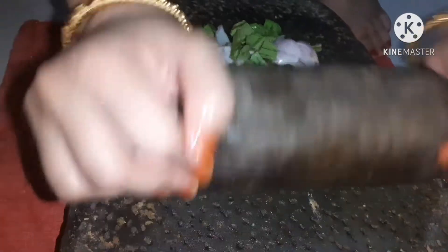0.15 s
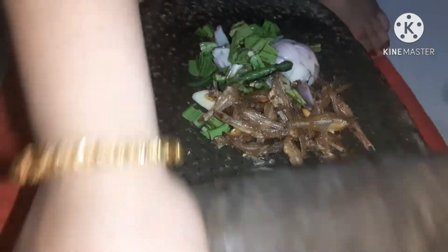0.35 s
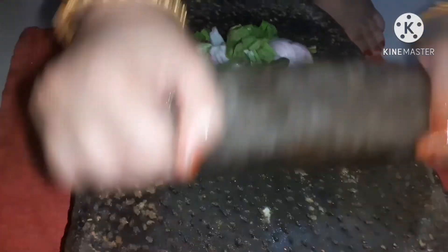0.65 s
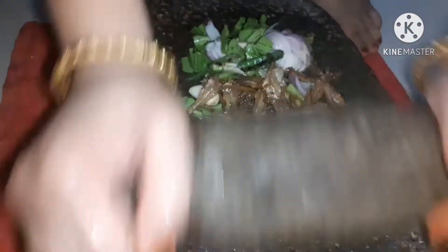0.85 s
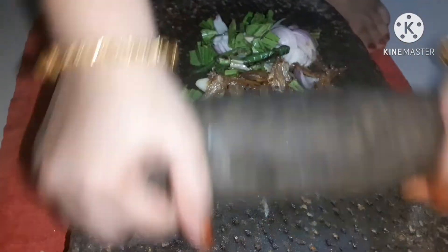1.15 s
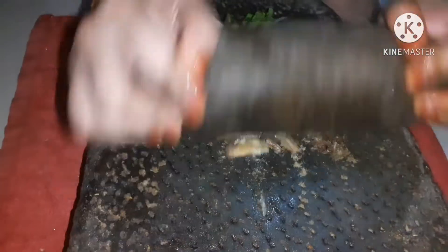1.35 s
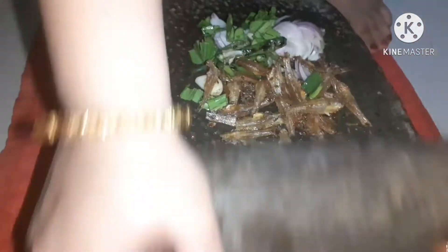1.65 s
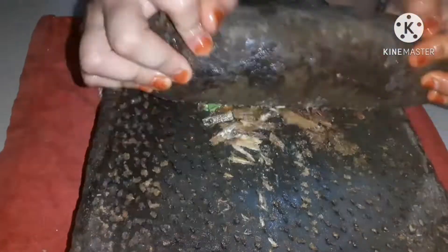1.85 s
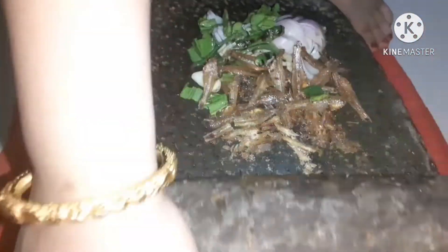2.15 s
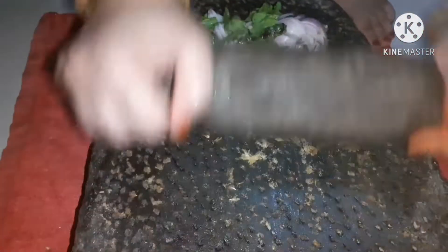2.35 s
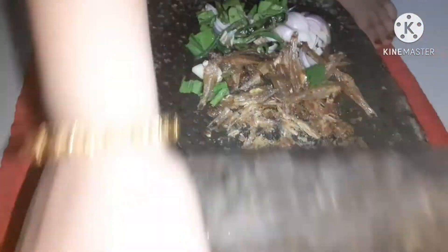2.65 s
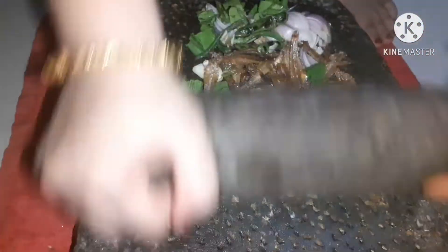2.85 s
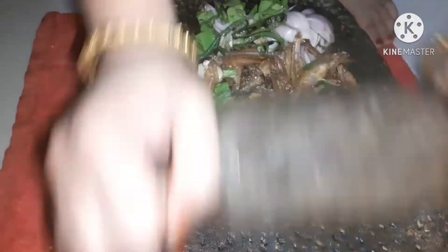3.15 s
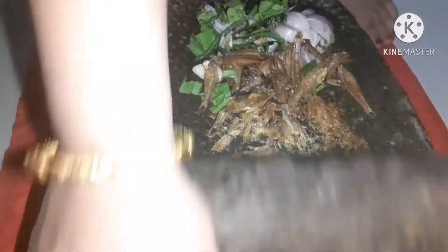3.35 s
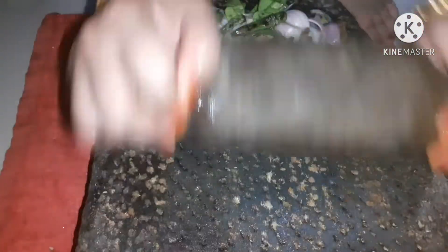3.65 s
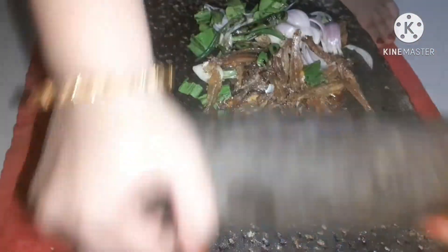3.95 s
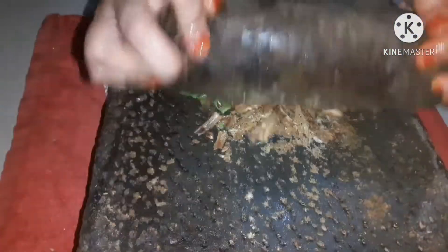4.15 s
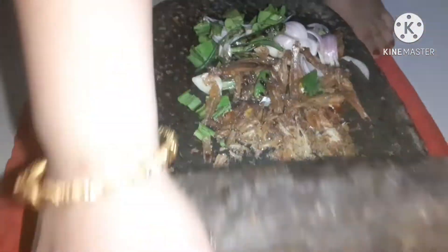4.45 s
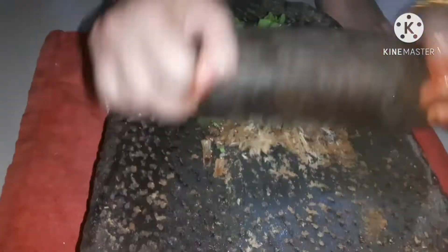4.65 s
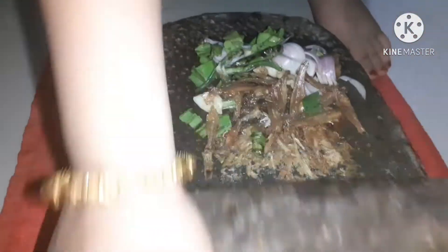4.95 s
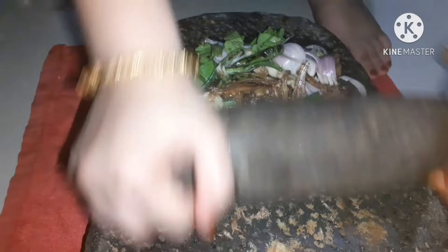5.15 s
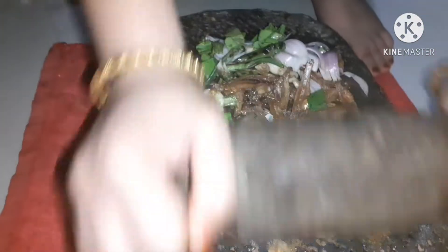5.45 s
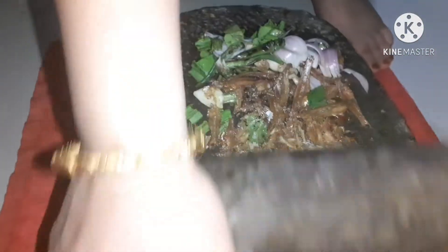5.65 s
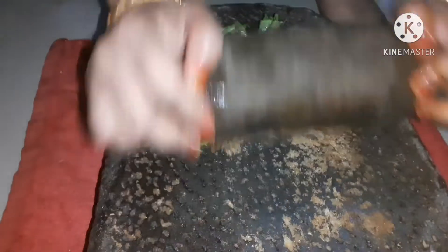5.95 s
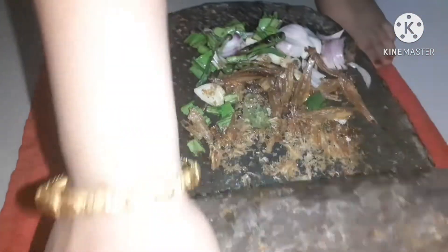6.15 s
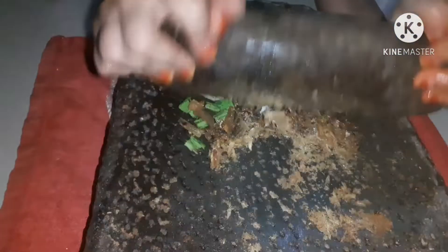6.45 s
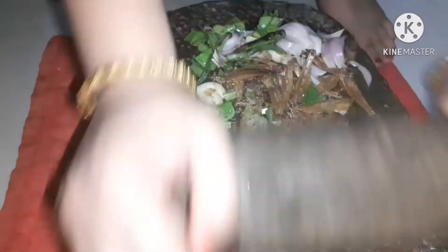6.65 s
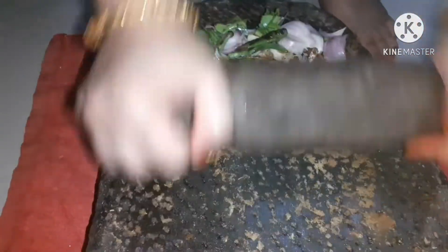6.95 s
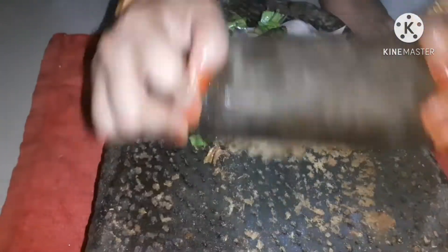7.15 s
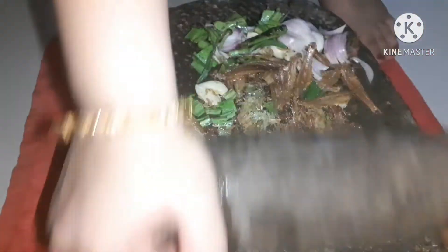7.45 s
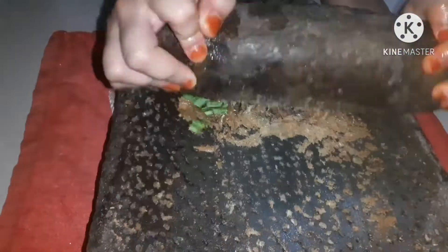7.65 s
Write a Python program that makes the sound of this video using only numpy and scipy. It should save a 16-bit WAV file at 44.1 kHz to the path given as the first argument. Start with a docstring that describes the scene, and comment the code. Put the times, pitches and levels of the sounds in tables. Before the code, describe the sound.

A heavy stone roller grinds back and forth over a pitted slab, crunching dried fish and herbs with crisp rasps, snaps and low rumble.

```python
"""A stone roller is pushed and pulled over a pitted stone slab in a kitchen, crushing dried fish and herbs.
Each stroke breaks countless fibres (tiny random clicks), rumbles the slab and rings the roller's bending note.
Early on the slab thuds once and stone knocks on stone; single bones and stalks snap throughout.
Two microphone ports listen close by: twice a flying crumb pops on the left one. Quiet room air lies beneath.
"""
import sys
import numpy as np
from scipy import signal
from scipy.fft import rfft, irfft
from scipy.io import wavfile
from scipy.ndimage import uniform_filter1d

SR = 44100
rng = np.random.default_rng(int(sys.argv[2]) if len(sys.argv) > 2 else 0)


def write(x):
    x = np.atleast_2d(x).T
    wavfile.write(sys.argv[1], SR, np.round(np.clip(x, -1, 1) * 32767).astype(np.int16))


N = 343980  # length in samples, 7.8 s

# strokes, a push away and a pull back in turn, each lasting until the next:
# (start time [s], crushing level [dB], slab rumble level [dB], roller ring level [dB])
STROKES = [(-0.049, -52.5, -44.5, -46), (0.247, -35, -34.0, -44), (0.493, -52.5, -44.5, -52),
           (0.777, -28, -39.5, -44), (1.042, -68, -48.0, -51), (1.29, -26.5, -36, -45.5),
           (1.661, -35.5, -44.0, -46), (1.904, -29.0, -39, -43.5), (2.235, -31, -47.5, -44.5),
           (2.525, -31, -38.5, -41.5), (2.78, -40.5, -47.5, -49.0), (3.051, -32.0, -39.5, -43),
           (3.373, -34.5, -43.5, -47.0), (3.632, -27.0, -41.0, -41.5), (3.934, -41.5, -41.0, -43.5),
           (4.216, -32.5, -46, -45.0), (4.513, -42.0, -44.5, -47), (4.783, -33.5, -40.5, -43),
           (5.11, -38.5, -47.5, -49.0), (5.37, -35.5, -48, -44.5), (5.694, -37.5, -49, -51),
           (5.988, -28.5, -36.5, -40.0), (6.284, -34.0, -42, -51), (6.572, -27.5, -37.5, -41.5),
           (6.866, -34, -40, -46.5), (7.161, -27.0, -37, -38), (7.465, -32, -42, -52),
           (7.719, -33, -40, -48.0)]
# tone of breaking food: (frequency [Hz], gain [dB])
CRUSH_COLOUR = [(500, -41), (1200, -17), (2100, -10), (3000, -2.5), (4600, 0), (7000, -0.5), (10500, -1),
                (15500, -9)]


def undb(db):
    """Turn decibels into a gain."""
    return 10 ** (np.asarray(db) / 20)


def unit(x):
    """Scale to an rms (average strength) of 1."""
    return x / np.sqrt(np.mean(x ** 2))


def together(*gains):
    """Unrelated sounds add in power, not in amplitude."""
    return np.sqrt(sum(g ** 2 for g in gains))


def convolve(x, response):
    """Pass a sound through an impulse response, channel by channel."""
    return signal.fftconvolve(np.atleast_2d(x), np.atleast_2d(response), axes=1)[:, :N]


def colour(x, points, size=4096):
    """Filter through (frequency [Hz], gain [dB]) points, with no sound ahead of its cause."""
    hz, db = np.transpose(points)
    f = np.maximum(np.fft.rfftfreq(size, 1 / SR), 1)
    gain_db = np.interp(np.log(f), np.log(hz), db)
    # folding the cepstrum (spectrum of the log gain) makes the response start at once
    cepstrum = irfft(np.log(undb(gain_db)))
    cepstrum[1:size // 2] *= 2
    cepstrum[size // 2 + 1:] = 0
    return convolve(x, irfft(np.exp(rfft(cepstrum))))


def fade(t60, length):
    """A decay lasting length seconds that falls 60 dB every t60 seconds."""
    return 1000. ** (-np.arange(int(length * SR)) / SR / t60)


def ring(modes, turn=0):
    """Fading notes after one blow, with peak 1; turn shifts their phase [radians]."""
    t = np.arange(SR // 2) / SR
    y = sum(undb(db) * np.sin(2 * np.pi * hz * t + turn) * fade(t60, .5) for hz, db, t60 in modes)
    return y / np.abs(y).max()


def blows(table):
    """One impulse for each (time [s], level [dB]) row."""
    x = np.zeros(N)
    for s, db in table:
        x[int(s * SR)] += undb(db)
    return x


def walk(rate):
    """A smooth random curve with rms 1, heading for a new value rate times a second."""
    k = max(int(SR / rate), 2)
    steps = np.repeat(rng.standard_normal(N // k + 1), k)
    return unit(uniform_filter1d(steps, k)[:N])


def grains(rate, spread_db, cap=4):
    """Random tiny impacts, about rate a second, a few much larger than the rest."""
    size = undb(spread_db * np.minimum(rng.exponential(size=N), cap))
    happens = rng.random(N) < rate / SR
    return unit(happens * size * rng.choice([-1, 1], N))


def spread(a, b, side):
    """Two unrelated sounds as the middle and side of a stereo pair."""
    return unit(a + side * b * np.array([[1], [-1]]))


def splinter(x, t60):
    """Each impact trails off as a tiny burst of fresh noise, different at each port."""
    tail = fade(t60, .1) ** 2
    power = np.abs(convolve(x ** 2, tail / tail.sum()))
    return np.sqrt(power) * rng.standard_normal((2, N))


def ports(x, right_db, delay=5):
    """The left port is nearer: the right one hears a few samples later and weaker."""
    return np.array([x, undb(right_db) * np.roll(x, delay)])


def patchy(x, depth_db, rate, count=18):
    """Overlapping frequency bands, wider towards the treble, swell and sink each on its own."""
    place = np.sqrt(np.linspace(0, 1, N // 2 + 1)) * (count - 1)
    spectrum = rfft(x)
    total = 0
    for k in range(count):
        band = irfft(spectrum * np.maximum(1 - np.abs(place - k), 0), N)
        total = total + band * undb(depth_db * walk(rate))
    return total


def stroke_phase():
    """Strokes done so far, at every sample: even ones are pushes, odd ones pulls."""
    starts = np.array(STROKES)[:, 0]
    turns = np.append(starts, starts[-1] + np.diff(starts).mean())
    return np.interp(np.arange(N) / SR, turns, np.arange(len(turns)))


def arch(phase, push_peak, pull_peak):
    """Rise from 0 at one turn to 1 at the given share of the stroke, and sink to 0 at the next turn."""
    done = phase % 1
    peak = np.clip(np.where(phase % 2 < 1, push_peak, pull_peak), .05, .95)
    return np.sin(np.pi / 2 * np.minimum(done / peak, (1 - done) / (1 - peak)))


def air():
    """The quiet air of the kitchen is steady soft noise."""
    # tone of the air: (frequency [Hz], gain [dB])
    air_colour = [(35, -15.5), (120, 4), (300, 0.5), (800, -3.5), (4000, -16), (15000, -41)]
    noise = spread(*rng.standard_normal((2, N)), side=0.46)
    return undb(-54.0) * unit(colour(noise, air_colour))


def collapses():
    """A whole piece gives way quickly and crumbles out: a swift rise and a slower fall in crushing."""
    # pieces collapsing under the roller: (peak time [s], time to fall to 1/e [s], level [dB])
    pieces = [(.116, .026, -31), (.141, 0.096, -23), (0.23, 0.023, -20.5), (.663, 0.11, -23.5),
              (.848, 0.023, -23.5), (1.45, 0.045, -30), (1.997, 0.042, -24), (6.036, 0.07, -26)]
    rise = 0.0091  # s, to grow by a factor e
    t = np.arange(N) / SR
    return together(*[undb(db) * np.exp(np.minimum((t - s) / rise, (s - t) / fall)) for s, fall, db in pieces])


def grinding():
    """The roller's motion sets pressure on the food, weight on the slab, stone contact and dry scraping."""
    phase = stroke_phase()
    levels = undb(np.array(STROKES)[:, 1:])
    crush_gain, rumble_gain, ring_gain = levels[phase.astype(int)].T
    # shares of a stroke at which the roller is fastest, and at which it bites hardest into the food
    speed = arch(phase, push_peak=0.59, pull_peak=0.45)
    bite = arch(phase, push_peak=0.61, pull_peak=.26)
    reach = (1 - np.cos(np.pi * phase)) / 2  # 0 at the near edge, 1 in the heap of food

    # at the far turn the roller leans into the heap, which goes on crackling and keeps it ringing
    heap_crush, heap_ring = undb(-37) * reach ** 4.1, undb(-60) * reach
    rest_crush, rest_ring = undb(-64), undb(-74)
    pressure = together(crush_gain * bite ** 3.28, heap_crush, collapses(), rest_crush)
    contact = together(ring_gain * speed ** 4.43, heap_ring, rest_ring)

    # the slab keeps trembling between strokes, 8.5 dB below their rumble levels
    tremble = undb(-8.5) * np.interp(phase, np.arange(len(levels)) + .5, levels[:, 1])
    weight = together(rumble_gain * speed ** 2.3, tremble)

    # bare stone scrapes until the paste spreads over it
    paste_start, paste_db_per_s = 0.96, 110  # s, dB/s
    paste_age = np.maximum(np.arange(N) / SR - paste_start, 0)
    dry = speed ** 1.7 * undb(-43 - paste_db_per_s * paste_age)
    return pressure, weight, contact, dry


def crushing(pressure):
    """Fibres break as a fine wet rasp with crackles in it; hard pressing breaks coarser pieces."""
    cracks = grains(320, spread_db=5.5)
    rasp = np.array([grains(11000, spread_db=2.0) for _ in range(2)])
    ticks = undb(-8.5) * ports(cracks, right_db=-12)
    bursts = undb(-5) * splinter(cracks, t60=0.031)
    # every crumbling piece has its own size, so its own colour
    breaks = patchy(rasp + ticks + bursts, depth_db=3, rate=50)
    breaks = breaks * undb(0.45 * walk(60) + 0.43 * walk(240))
    coarse = colour(breaks, [(2800, -5.5), (6000, -10.0), (12000, -23)])
    food = breaks + undb(-15.5) * unit(pressure) * coarse
    return undb(0.6) * pressure * unit(colour(food, CRUSH_COLOUR))


def rumble(weight):
    """The pits in the stone shake the slab in lumps: low-toned random bumps."""
    # tone of the shaken slab: (frequency [Hz], gain [dB])
    rumble_colour = [(25, -51), (55, -17.5), (80, -9), (120, 5.5), (148, -6), (190, -1.5), (235, -21),
                     (330, -17), (480, -39.5), (1000, -46.5)]
    bumps = [colour(grains(600, spread_db=3.15), rumble_colour) for _ in range(2)]
    return undb(1.7) * weight * spread(*bumps, side=0.049)


def scrape(weight, contact, pressure, dry):
    """Grit drags between the faces, more with weight, stone contact and crushing."""
    # tone of dragged grit: (frequency [Hz], gain [dB])
    scrape_colour = [(200, -1), (450, -5), (620, 5), (800, 5), (1100, 3.5), (1450, -3), (1800, -4.5),
                     (2500, -4.5), (5000, -28)]
    drag = together(undb(-11) * weight, undb(-9) * contact, undb(-22) * pressure, dry)
    grit = [colour(grains(1500, spread_db=2.5), scrape_colour) for _ in range(2)]
    return drag * spread(*grit, side=0.45) * undb(3.45 * walk(40))


def song(contact):
    """Rubbing keeps the roller's bending note sounding unevenly; it swells and fades with the stone contact."""
    bending = ring([(1675.0, 7, .12), (1746, -9.5, 0.062)])  # (frequency [Hz], level [dB], 60 dB decay [s])
    rubbed = [convolve(grains(1100, spread_db=4.0), bending) for _ in range(2)]
    return undb(3.5) * contact * spread(*rubbed, side=1.0) * undb(2.0 * walk(32))


def chatter(contact, dry):
    """Hard grit on bare stone also wakes the roller's higher modes, in brief squeaks."""
    # (frequency [Hz], level [dB], 60 dB decay [s])
    modes = ring([(1810, 0.5, 0.029), (3890, -3.5, 0.03), (5100, -3.5, 0.051)])
    ringing = unit(np.vstack([convolve(grains(1500, spread_db=6.6), modes) for _ in range(2)]))
    bursts = undb(4 * walk(22))
    return (undb(-3.5) * dry + undb(-10) * contact) * ringing * bursts


def thuds():
    """The heavy slab tips and lands on its cloth, sounding its low, short notes."""
    # the slab rocks: (time [s], level [dB])
    landings = [(0.358, -10)]
    # notes of the slab: (frequency [Hz], level [dB], 60 dB decay [s])
    slab_modes = [(110.4, -14, 0.13), (178, 8.5, 0.023), (305, -4.5, 0.048), (580, -3.5, 0.015),
                  (790, -1.5, 0.01)]
    thud = convolve(blows(landings), ring(slab_modes))[0]
    return colour(ports(thud, right_db=-1.0), [(35, -37), (85, 2.5), (3000, 3.5)])


def snaps():
    """A bone or stalk gives way with a sharp tick and a short splintering."""
    # single pieces snapping: (time [s], level [dB])
    breakages = [(0.6658, 0), (0.7265, -2.5), (0.8095, -4.5), (0.8465, -2), (0.867, 2), (1.9171, -2.5),
                 (1.99, -7), (2.5503, -1.5), (3.0648, -8.5), (3.1133, -8), (3.6283, -7), (3.679, -5),
                 (3.701, -0.5), (4.2655, -15.5), (4.867, -24), (5.3205, -25), (5.9328, -5.5), (6.5535, -7),
                 (7.089, -10), (7.216, -2), (7.7587, -8)]
    ticks = blows(breakages)
    sharp = undb(6.0) * ports(ticks, right_db=-5)
    return colour(sharp + undb(8.5) * splinter(ticks, t60=0.057), CRUSH_COLOUR)


def knocks():
    """Stone on stone clinks freely for a moment, then the roller settles and the ring is choked."""
    # the roller hits bare stone: (time [s], level [dB])
    hits = [(0.7666, -9.5), (0.9255, 1.5), (1.3367, -4)]
    # notes of roller on slab, before choking: (frequency [Hz], level [dB], 60 dB decay [s])
    stone_modes = [(808, -5, .03), (988, -5, .03), (1310, -7, .02), (1682, 0, .35), (1790, -10, .025)]
    free_time, choke_t60, left_db = .014, .022, -19  # s, s, dB at which the choking stops
    t = np.arange(SR // 2) / SR
    choke = np.maximum(1000. ** (-np.maximum(t - free_time, 0) / choke_t60), undb(left_db))
    # the bending roller reaches the two ports out of step
    ringing = np.array([ring(stone_modes), ring(stone_modes, turn=-1.32)])
    clink = convolve(blows(hits), choke * ringing)
    crack = colour(splinter(blows(hits), t60=.025), [(200, -14), (800, 10), (2000, 8), (5000, -10)])
    return clink + crack


def crumbs():
    """A crumb on the port makes it swing and settle: a low pop on the left alone."""
    # crumbs striking the left port: (time [s], level [dB])
    strikes = [(1.3753, -1), (3.7199, 1)]
    # swings of the struck port: (frequency [Hz], level [dB], 60 dB decay [s])
    port_modes = [(68.5, -3, 0.056), (155, -7, 0.018), (520, -3, 0.0016)]
    swing = convolve(blows(strikes), ring(port_modes, turn=-np.pi / 2))
    pop = colour(swing, [(600, 0.5), (1500, -2), (4000, -54), (12000, -22)])
    return pop * np.array([[1], [0]])


def kitchen(x, t60, wet_db):
    """Hard walls add a short diffuse tail of fading noise with little bass."""
    tail = rng.standard_normal((2, SR // 2)) * fade(t60, .5)
    tail[:, :SR // 200] = 0  # nothing returns in the first 5 ms
    tail /= np.sqrt(np.sum(tail ** 2, axis=1, keepdims=True))
    echo = colour(convolve(x, tail), [(100, -9), (700, 6.5), (3000, 9.5), (12000, 7)])
    return x + undb(wet_db) * echo


def scene():
    """Grinding, snaps, knocks and a thud in the kitchen, with crumb pops and quiet air."""
    pressure, weight, contact, dry = grinding()
    food = crushing(pressure) + snaps()
    stone = rumble(weight) + scrape(weight, contact, pressure, dry) + song(contact) + chatter(contact, dry)
    hits = kitchen(knocks() + thuds(), t60=0.27, wet_db=-16.5)
    return kitchen(food + stone, t60=0.16, wet_db=-18.5) + hits + crumbs() + air()


def record(dry):
    """The left port resonates in the treble where the right has a notch; high peaks clip and the top is cut."""
    # response of each microphone port: (frequency [Hz], gain [dB])
    left_port = [(1500, 0), (4000, -1), (7000, 0), (8100, -1.5), (8900, 8), (10000, 3), (12000, 1.5),
                 (15000, 3.5)]
    right_port = [(100, -1.5), (1500, -0.5), (4300, -3), (6000, -9.5), (6800, -13.5), (7700, -23),
                  (8400, -91), (9300, -12), (11000, -4), (15000, -1)]
    top_hz = 15700
    heard = np.vstack([colour(dry[0], left_port), colour(dry[1], right_port)])
    clipped = np.clip(heard, -.85, .85)
    return signal.sosfilt(signal.ellip(10, .2, 80, top_hz, fs=SR, output="sos"), clipped)


dry = scene()
out = record(dry)
write(out)
```